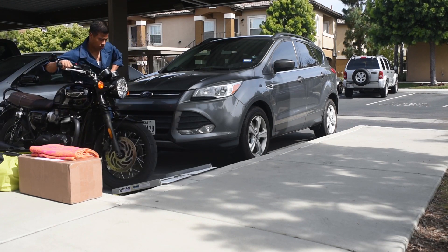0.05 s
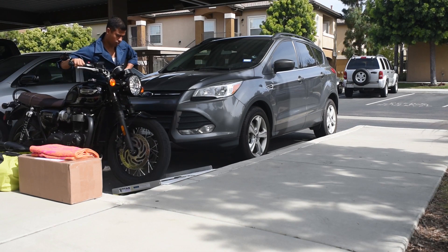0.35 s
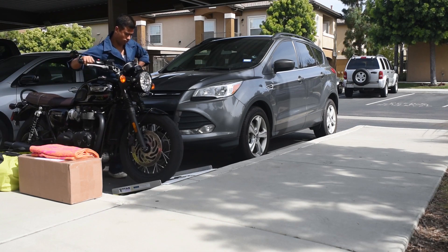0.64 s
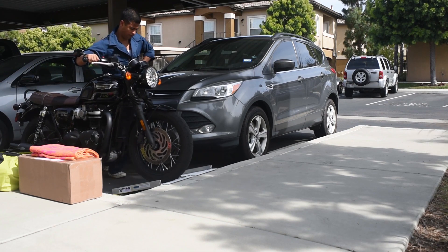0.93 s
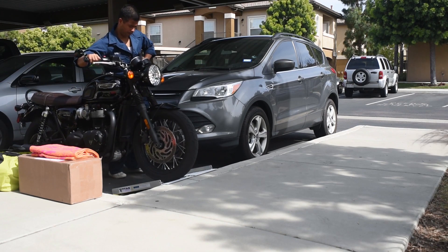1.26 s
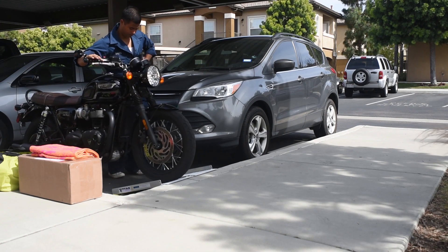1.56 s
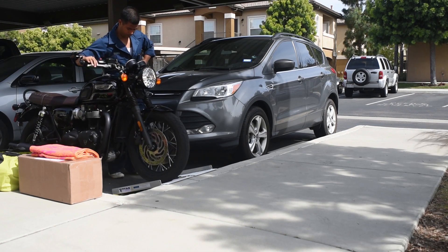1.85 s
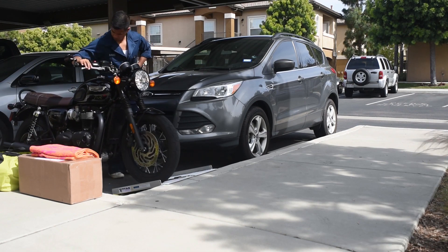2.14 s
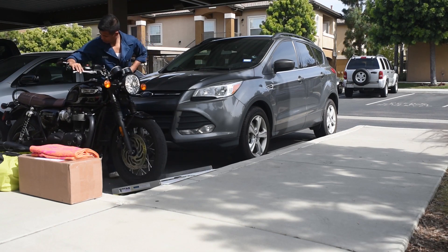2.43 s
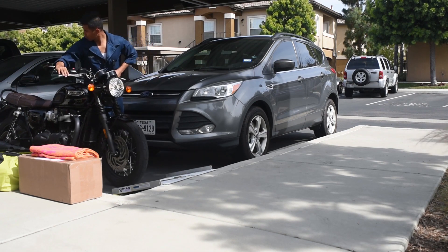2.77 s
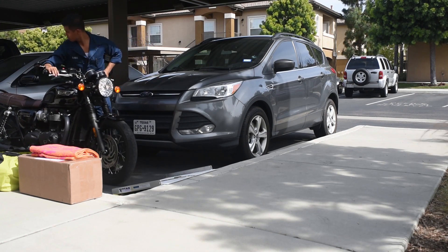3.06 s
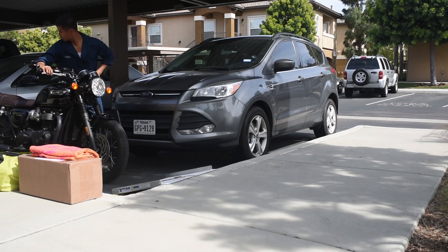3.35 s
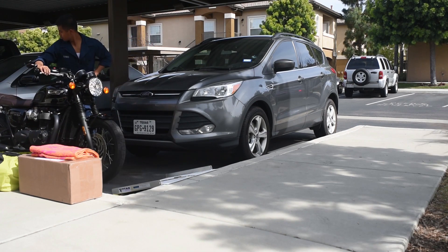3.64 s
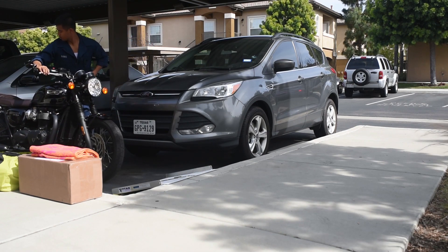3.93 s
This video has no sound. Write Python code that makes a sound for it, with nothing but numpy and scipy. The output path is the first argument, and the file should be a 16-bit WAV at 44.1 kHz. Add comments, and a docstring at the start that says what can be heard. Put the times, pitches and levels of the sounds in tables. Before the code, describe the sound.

A two-cylinder motorcycle engine thuds and whirrs at idle, close by in a covered parking space. The gearbox clacks sharply, the bike rolls with a soft rumble and rub, and the gearbox clacks again with a brief echo.

```python
"""Motorcycle idling under a carport

A two-cylinder motorcycle idles while its rider walks it back and forth with a soft rumble and rub.
Uneven pairs of firings thud through the muffler. The valves tick, the gears whirr and whine,
and light taps ring the engine covers. Twice the gearbox clacks: a light touch of the lever,
then the gears slam together and rattle, ringing the metal case and the carport."""
import sys
import numpy as np
from scipy import signal
from scipy.fft import rfft, irfft
from scipy.io import wavfile

SR = 44100
rng = np.random.default_rng(int(sys.argv[2]) if len(sys.argv) > 2 else 0)


def int16_out(signal):
    """Quantize to a 16-bit WAV file."""
    q = np.round(np.clip(np.atleast_2d(signal).T, -1, 1) * 32767)
    wavfile.write(sys.argv[1], SR, q.astype(np.int16))


N = 176400


def undb(db):
    """Turn decibels into a gain to multiply by."""
    return 10 ** (np.asarray(db) / 20)


def level(x, db):
    """Scale a sound to an average (rms) level."""
    return x * undb(db) / np.sqrt(np.mean(x ** 2))


def follow(t, points):
    """Join a table's points with straight lines over time."""
    return np.interp(t, *np.array(points).T)


def bins():
    """The frequency in Hz of each slot (bin) of the spectrum."""
    return np.maximum(np.arange(N // 2 + 1) * SR / N, 1)


def curve(points, column=1):
    """Join a table's points over frequency, spaced by octaves."""
    table = np.array(points, float)
    return np.interp(np.log(bins()), np.log(table[:, 0]), table[:, column])


def colour(x, gain):
    """Filter a sound with one gain for each frequency."""
    return irfft(rfft(x) * gain, N)


def resonance(hz, width_hz):
    """Gains that favour one ringing pitch, 1 at its centre."""
    return 1 / (1 + 1j * hz / width_hz * (bins() / hz - hz / bins()))


def above(hz):
    """Gains that steeply cut everything below hz."""
    return 1 / np.sqrt(1 + (hz / bins()) ** 8)


def bump(hz, octaves):
    """A bell shape of height 1 around a pitch."""
    return np.exp(-(np.log2(bins() / hz) / octaves) ** 2 / 2)


def fade(age, t60):
    """Start at age 0, then die away by 60 dB every t60 seconds."""
    return (age >= 0) * np.exp(-np.log(1000) * np.maximum(age, 0) / t60)


def wander(size, count):
    """A random line that strays by about 1 and bends count times."""
    return 1.2 * np.interp(np.linspace(0, count, size), np.arange(2048), rng.standard_normal(2048))


def ripple(depth_db, spacing_hz=30):
    """Gains for the many close, narrow resonances of cast metal."""
    return undb(depth_db * wander(N // 2 + 1, SR / 2 / spacing_hz))


def noise(gain, stereo):
    """Filtered noise of rms 1, spread between the ears by a stereo table."""
    mid, side = rng.standard_normal((2, N))
    sign, spread = np.array([[1], [-1]]), undb(curve(stereo))
    pair = (rfft(mid) + sign * spread * rfft(side)) / np.sqrt(1 + spread ** 2)
    balance = undb(sign * curve(stereo, column=2) / 2)
    return level(irfft(pair * gain * balance, N), 0)


# How much of each frequency the muffler lets through: f/Hz, level/dB
MUFFLER = [(18, -60), (32, -27.5), (42, -8), (54, -8.5), (66, -15.5), (85, -5), (114, 1), (140, -19),
           (180, -27.5), (240, -36.5), (400, -60), (1000, -100)]
# Echoes from cars and the roof: delay/s, gain (a minus flips the wave)
ECHOES = [(.0088, 0.081), (0.018, -0.4), (0.0371, 0.25)]
# The thuds rise as the engine works harder: t/s, level/dB
EXHAUST_LEVEL = [(0, -1), (1.7, 0), (3.55, 0), (3.9, 0.5)]
# Tone of the boom under the roof: f/Hz, level/dB
ROOF_BOOM = [(90, -12.5), (150, 9), (190, -6.5), (230, -2), (290, -10), (345, -11), (420, -20.5),
             (700, -49), (1500, -64)]
def exhaust(t, cycle):
    """Two unevenly spaced firings a cycle thud through the muffler, echo and boom under the roof."""
    pulses, whole_cycles = np.zeros(N), np.arange(np.ceil(cycle[-1]) + 1)
    for lead_cycles, db in ((.368, -3.26), (0, 0)):  # the leading cylinder is the weaker one
        at = np.searchsorted(cycle, whole_cycles - lead_cycles)
        strength = undb(db + 1.43 * rng.standard_normal(64)[:len(at)])
        pulses[at[at < N]] -= strength[at < N]
    thuds = colour(pulses, undb(curve(MUFFLER)))
    echoes = sum(gain * np.interp(t - delay, t, thuds, left=0) for delay, gain in ECHOES)
    heard = (thuds + echoes) * undb(follow(t, EXHAUST_LEVEL))
    roof = rfft(rng.standard_normal(N) * fade(t, t60=.26))
    boom = colour(pulses, roof * undb(curve(ROOF_BOOM)))
    return level(heard, -32) + level(boom, -43.5)


def throb(cycle, depth=.27):
    """The load on the gears rises and falls once per turn of the crankshaft."""
    return 1 + depth * np.cos(2 * np.pi * (2 * cycle - .5))


FLUTTER_PER_S = 32
# Tone of the whirr: f/Hz, level/dB
WHIRR_TONE = [(210, -33), (350, -11.5), (913, -9), (1050, -6), (1170, -12.5), (1270, -7), (1880, -8.5),
              (2130, -9), (5570, -18), (8380, -18.5), (15000, -40.5)]
# Pitches at which the engine covers ring: f/Hz, width/Hz, level/dB
COVER_RINGS = [(1080, 79, -0.5), (1252, 38, -1.5), (1594, 74, -1), (2150, 150, -4), (3267, 184, -6.5),
               (3594, 90, -9), (4280, 31, -12), (7530, 170, -13), (8660, 120, -12.5), (10200, 110, -25)]
# Base level of the whirr, covers and whine: t/s, level/dB
ENGINE_LEVEL = [(0, -49.5), (1.3, -50.5), (1.57, -49), (1.95, -50.5), (2.65, -51), (3.3, -51), (4, -51.5)]
# Change in the whine and low cover ring, strongest with the bike rolled forward: t/s, level/dB
RING_LEVEL = [(0, -17), (.7, 2), (2.3, -3), (3.3, -9), (4, -2)]
# Width and position of the engine: f/Hz, side minus mid/dB, left minus right/dB
ENGINE_STEREO = [(400, -27, 0), (750, -12, 0), (1300, -8, .5), (2400, -2, 0), (4400, -1, 3), (8200, 0, 7.5)]
def machinery(t, cycle):
    """Gears and chain whirr, and the ringing covers pulse once per turn of the crankshaft."""
    covers = 0
    for first in range(3):  # three groups of pitches, each fluttering on its own
        group = COVER_RINGS[first::3]
        gain = np.sqrt(sum(abs(undb(db) * resonance(hz, width)) ** 2 for hz, width, db in group))
        flutter = undb(2 * wander(N, FLUTTER_PER_S * N / SR))
        covers += np.linalg.norm(gain) * flutter * noise(gain * above(700), ENGINE_STEREO)
    covers = level(covers, 1.3)
    high_ring = colour(covers, above(1400))
    low_ring = (covers - high_ring) * undb(follow(t, RING_LEVEL))
    tone = undb(curve(WHIRR_TONE)) * above(200) * ripple(depth_db=1.3)
    whirr = undb(3) * noise(tone, ENGINE_STEREO)
    return undb(follow(t, ENGINE_LEVEL)) * (whirr + throb(cycle) * (high_ring + low_ring))


# Valve ticks within one engine cycle: position/cycles, level/dB
VALVE_TICKS = [(.16, -6), (.5, 1), (.77, -5), (.88, 0.5)]
# Tone of a tick: f/Hz, level/dB
TICK_TONE = [(2000, -12), (4000, -3), (6000, -8), (8400, 0), (9500, -4.5), (14000, -15)]
def valves(cycle, decay_s=.0089):
    """The valves tick four times a cycle, each a tiny burst of bright noise."""
    cycles_per_s = np.gradient(cycle) * SR
    bursts = 0
    for position, db in VALVE_TICKS:
        age = ((cycle - position) % 1) / cycles_per_s
        bursts += undb(db) * np.exp(-age / decay_s)
    hiss = noise(undb(curve(TICK_TONE)) * above(2000), ENGINE_STEREO)
    return level(bursts * hiss, -59)


def whine(t, cycle, waves_per_cycle=100):
    """Meshing gears sing a wavering, throbbing tone that follows the engine speed."""
    bends = FLUTTER_PER_S * N / SR
    flutter_db = 5 * wander(N, bends)
    wobble_rad = 1.15 * wander(N, 2 * bends)
    db = follow(t, ENGINE_LEVEL) + follow(t, RING_LEVEL) - 7.5 + flutter_db
    return undb(db) * throb(cycle) * np.sin(2 * np.pi * waves_per_cycle * cycle + wobble_rad)


# One long tyre rumble and three soft rubs: middle t/s, half length/s, f/Hz, width/Hz, level/dB
ROLLING_SWELLS = [(1.07, 0.86, 246, 240, -55.5), (1.12, 0.19, 3700, 810, -57),
                  (1.54, 0.23, 3850, 1700, -57), (3.26, 0.28, 3300, 120, -57.5)]
def rolling(t):
    """Bands of noise swell and fade as the bike rolls."""
    out = 0
    for middle, half_length, hz, width, db in ROLLING_SWELLS:
        swell = np.exp(-((t - middle) / half_length) ** 2 / 2)
        out += undb(db) * swell * noise(resonance(hz, width) ** 2, ENGINE_STEREO)
    return out


# The blows that make up the two clacks: t/s, level/dB, brightness/(dB per octave), hollow knock/dB
GEAR_BLOWS = [(0.0907, -23, 0.7, 9), (.118, -14, 1.4, 1), (0.1224, -12.5, 0, 2), (.139, -18.5, 3.5, 2),
              (.159, -15, 2, 9.5), (0.1653, -15.5, -0.3, -1.5), (.179, -19.5, 2, 8), (.224, -24, -0.5, 3),
              (0.255, -30.5, -1.5, 5.5), (2.595, -39, 0, 4.5), (2.657, -47, -2, 11),
              (2.7286, -21.5, 0, 5.5), (2.743, -21, 0.5, -21), (2.755, -17.5, 0.2, 0),
              (2.7607, -10.5, 2.05, 4), (2.786, -19, 0.9, 12), (2.802, -21, 1, 1), (2.81, -19, 1.5, -3),
              (2.833, -19.5, 0.6, -1.5), (2.864, -27.5, -1.9, 4)]
# Tone of the gearbox's noisy ring: f/Hz, level/dB
GEARBOX_TONE = [(100, -14), (185, 4.5), (250, 1), (330, -5), (430, 0.5), (600, -4), (740, 2.5), (1030, -4),
                (1220, 4), (1700, -1.5), (3800, -0.5), (4400, -2.5), (6000, -3), (8600, -7), (10500, -15.5),
                (15000, -27.5)]
# Clear notes of the gearbox case: f/Hz, level/dB, time to fade by 60 dB/s
CASE_NOTES = [(418, -6, .3), (553, -5, .3), (743, 1, .16), (799, -4, .16), (657, -5, .2), (938, -3, .3),
              (1170, -6, .2), (2105, -6, .3), (3238, -1, .3), (3570, -4, .25), (3832, -3, .25),
              (3954, -3, .25), (4730, -6, .25), (5845, -3, .25)]
# Width and position of the clacks: f/Hz, side minus mid/dB, left minus right/dB
CLACK_STEREO = [(400, -30, 0), (700, -21, .5), (1300, -11, .5), (2400, -6, 0), (4400, -4, 2),
                (8200, -2, 4.2)]
def gearbox(t):
    """Each blow cracks, rings the case with noise and clear notes, and dies away in the carport."""
    out, span = np.zeros((2, N)), t[:SR // 2]
    body = undb(curve(GEARBOX_TONE)) * above(110) * ripple(depth_db=1.9)
    octaves = np.log2(np.clip(bins(), 400, 8000) / 2500)
    hollow, low = bump(740, octaves=.35), bump(195, octaves=.3)
    for start, db, brightness, knock_db in GEAR_BLOWS:
        thump_db = 1.44 * max(db + 14.5, 0)  # only the hardest blows shake the frame into a thump
        tone = undb(brightness * octaves + knock_db * hollow + thump_db * low)
        age, at = t - start, int(start * SR)
        crack = undb(-14) * fade(age, t60=.012)
        ring = undb(-1) * fade(age, t60=.092)
        build_up = 1 - np.exp(-np.maximum(age, 0) / .011)
        carport = undb(-7) * build_up * fade(age, t60=.31)
        loudness = np.sqrt(crack ** 2 + ring ** 2 + carport ** 2)
        out += undb(db) * loudness * noise(body * tone, CLACK_STEREO)
        for hz, note_db, t60 in CASE_NOTES:
            spread_rad = min(hz / 4000, 1) ** 2  # higher notes sound wider
            phase = 2 * np.pi * rng.random() + spread_rad * rng.standard_normal((2, 1))
            note = np.sin(2 * np.pi * hz * span + phase) * fade(span, t60)
            strength = undb(db + note_db - 23.5) * np.interp(hz, bins(), tone)
            out[:, at:at + len(span)] += strength * note
    return out


# When the engine covers are tapped: t/s
TAP_TIMES = [1.04, 1.098, 1.231, 1.452, 1.565, 1.686, 1.789, 2.322]
def taps(t, scatter_db=3):
    """Light metallic taps ring the covers, a little differently each time."""
    out, span = np.zeros((2, N)), t[:SR // 5]
    for start in TAP_TIMES:
        at = int(start * SR)
        for hz, _, note_db in COVER_RINGS:
            phase = 2 * np.pi * rng.random() + min(hz / 3000, 1) * rng.standard_normal((2, 1))
            note = np.sin(2 * np.pi * hz * span + phase) * fade(span, t60=.06)
            strength = undb(note_db - 46.5 + scatter_db * rng.standard_normal())
            out[:, at:at + len(span)] += strength * note
    return out


# The engine's drifting idle: t/s, speed/(crankshaft turns per minute)
IDLE_SPEED = [(0.0, 1315.3), (0.6, 1287.6), (1.02, 1237.5), (1.38, 1331.8), (1.7, 1260.5), (2.0, 1293.7),
              (2.35, 1264.5), (2.55, 1299.3), (2.9, 1275.7), (3.35, 1353.8), (3.7, 1297.5), (4.0, 1297.4)]
def scene():
    """Count engine cycles, two crankshaft turns each, and add all the sounds together."""
    t = np.arange(N) / SR
    cycle = np.cumsum(follow(t, IDLE_SPEED)) / (2 * 60 * SR)
    cycle -= np.interp(.04, t, cycle)  # the stronger cylinder first fires at 0.04 s
    engine = exhaust(t, cycle) + machinery(t, cycle) + valves(cycle) + whine(t, cycle)
    return engine + rolling(t) + gearbox(t) + taps(t)


def record(dry):
    """Round off the highest peaks, keep the bass in the centre and cut the very top of the treble."""
    ceiling, bass_hz, top_hz = .8, 350, 15000
    left, right = dry / (1 + (dry / ceiling) ** 4) ** .25
    mid = (left + right) / 2
    side = colour((left - right) / 2, above(bass_hz))
    treble_cut = signal.ellip(8, .2, 80, top_hz, fs=SR, output="sos")
    return signal.sosfilt(treble_cut, [mid + side, mid - side])


dry = scene()
out = record(dry)
int16_out(out)
```